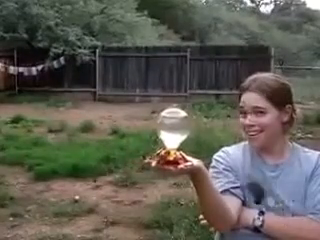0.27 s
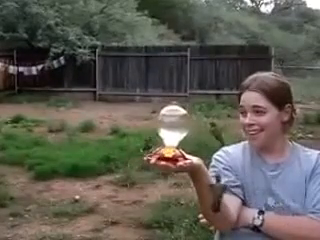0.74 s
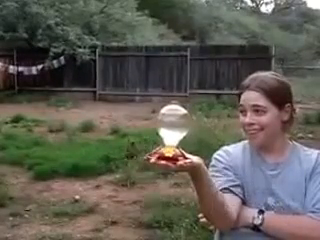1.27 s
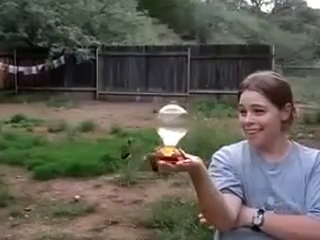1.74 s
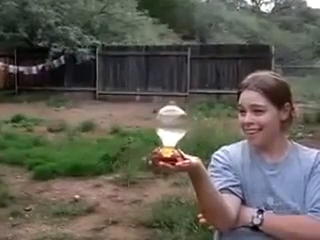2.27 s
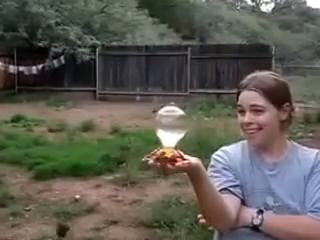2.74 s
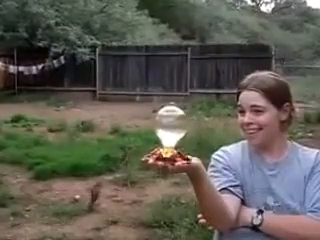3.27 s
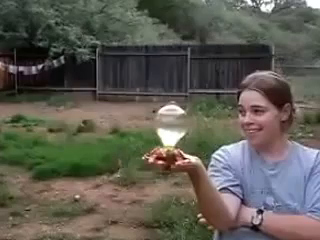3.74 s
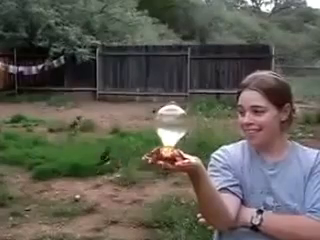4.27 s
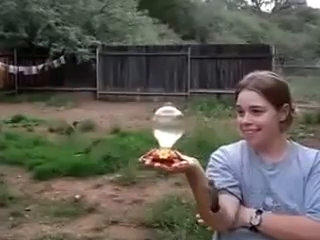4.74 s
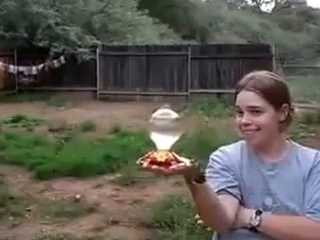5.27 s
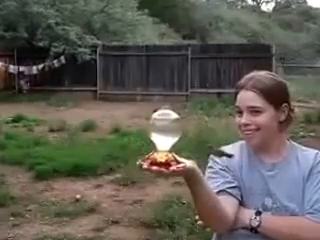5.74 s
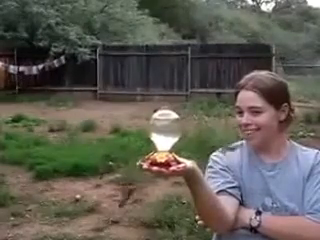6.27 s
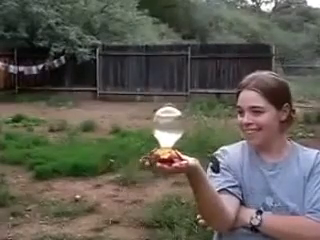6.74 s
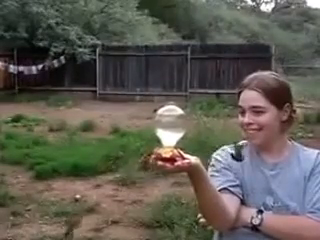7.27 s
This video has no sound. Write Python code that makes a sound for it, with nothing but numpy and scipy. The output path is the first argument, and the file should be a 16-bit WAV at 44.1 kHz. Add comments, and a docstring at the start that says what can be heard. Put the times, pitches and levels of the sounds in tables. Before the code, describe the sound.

Rapid high hummingbird chirps, brief squeals and buzzy chatter, with wings thrumming close past a small, lo-fi camera microphone outdoors.

```python
"""Hummingbirds round a feeder

Hummingbirds crowd round a hand-held feeder in a back yard. Sharp falling chips, lighter ticks and warbled
squeals are swept whistles with an octave; buzzy trills and chatter are a rough whistle gated in quick bursts.
Wings hum and purr as trains of air pulses with swishing noise; gusts are decaying low sines.
Behind lie faint far ticks, coloured air noise, a yard tail and a fence echo. A small camera with
a low sample rate folds the overtones down and adds a faint whine."""
import sys
import numpy as np
from scipy import signal
from scipy.fft import rfft, irfft
from scipy.io import wavfile
from scipy.ndimage import uniform_filter1d, map_coordinates

SR = 44100
rng = np.random.default_rng(int(sys.argv[2]) if len(sys.argv) > 2 else 0)


def int16_out(signal):
    """Quantize to a 16-bit WAV file."""
    q = np.round(np.clip(np.atleast_2d(signal).T, -1, 1) * 32767)
    wavfile.write(sys.argv[1], SR, q.astype(np.int16))


N = 331632
TIME = np.arange(N) / SR
UPSTROKE_S = .0062   # from call onset to top of sweep


def from_db(db):
    """Amplitude ratio of a level in dB."""
    return 10 ** (np.asarray(db) / 20)


def rms_one(x):
    """Scale to rms 1."""
    return x / np.sqrt(np.mean(x ** 2) + 1e-20)


def read(rows, t):
    """Interpolate each column of a curve at the times t."""
    s, *columns = np.transpose(rows)
    return [np.interp(t, s, c) for c in columns]


def add(out, s, sound):
    """Mix a sound in from time s on."""
    at = round(s * SR) + np.arange(len(sound))
    inside = (at >= 0) & (at < N)
    out[at[inside]] += sound[inside]


def wander(per_s, t):
    """Smooth random curve, spread about 1, over the times t."""
    steps = (t - t[0]) * per_s
    knots = rng.standard_normal(int(steps[-1]) + 4)
    return map_coordinates(knots, [steps + 1], order=2, mode="nearest")


def low_pass(x, hz):
    """Second-order low-pass."""
    return signal.sosfilt(signal.butter(2, min(hz, .45 * SR), fs=SR, output="sos"), x)


def noise(spectrum):
    """Gaussian noise of a given spectrum, log-interpolated in frequency; rms 1."""
    hz, db = np.transpose(spectrum)
    bins_hz = np.maximum(np.arange(N // 2 + 1) * SR / N, 1)
    gain = from_db(np.interp(np.log(bins_hz), np.log(hz), db))
    return rms_one(irfft(rfft(rng.standard_normal(N)) * gain, N))


def turns(per_s):
    """Cycles done so far at a changing rate."""
    return np.cumsum(per_s) / SR


def syrinx(hz, overtone_db):
    """Voice: a whistle with a weaker octave."""
    phase = 2 * np.pi * turns(hz)
    return np.sin(phase) + from_db(overtone_db) * np.sin(2 * phase)


def sweep(t, top_hz, knee_hz, fall_s, sag_hz_per_s, overtone_db, rough):
    """One call: pitch shoots up, rounds the top, drops to a knee, sags, then droops at the end."""
    rising = top_hz * np.exp(np.minimum(t, 0) / .0062)
    drop = np.exp(-(np.maximum(t, 0) / fall_s) ** 1.136)
    falling = knee_hz + (top_hz - knee_hz) * drop - sag_hz_per_s * t
    droop = 1 - .12 * np.exp((t - t[-1]) / .0036)
    hz = np.where(t < 0, rising, falling) * droop * (1 + rough * wander(656, t))
    return from_db(1.6 * wander(300, t)) * syrinx(hz, overtone_db)


def envelope(t, attack_s, hold_s, fade_db, fade_s, release_s):
    """A call opens, holds past the top of its sweep, fades to a softer tail and closes."""
    opening = np.clip((t - t[0]) / attack_s, 0, 1) ** 2
    closing = np.clip((t[-1] - t) / release_s, 0, 1) ** 2
    fade = from_db(fade_db * (np.exp(-np.maximum(t - hold_s, 0) / fade_s) - 1))
    return opening * closing * fade


def scattered(call, share, spread_s):
    """Feeder, arm and ground throw back 24 faint early copies, at new delays for every call."""
    paths = np.zeros(int(.03 * SR))
    delays = (.0012 + rng.exponential(spread_s, size=24)) * SR
    signs = rng.choice([-1, 1], len(delays))
    paths[delays.astype(int) % len(paths)] = share * signs / np.sqrt(len(delays))
    paths[0] = 1   # direct path
    return signal.fftconvolve(call, paths)


# chips: sweep top t/s, dry level/dB, knee f/Hz, fall time/s, upstroke level/dB
CHIP_CALLS = [(.019, -23.5, 3300, 0.0079, -20), (0.2954, -23.5, 3380, .0081, -13),
              (.423, -20, 3430, 0.0068, -12), (.945, -17, 3530, .0067, -12.5),
              (1.0463, -16, 3450, 0.0068, -12), (1.4977, -15.5, 3490, 0.0066, -10.5),
              (1.8692, -15.5, 3680, 0.0056, -3.5), (2.1415, -17, 3480, 0.0064, -4),
              (2.5238, -16, 3680, .0066, -2.5), (2.6472, -17.5, 3600, 0.0061, -14),
              (2.798, -22, 3430, .0082, -5), (3.213, -21.5, 3580, 0.0085, -24),
              (3.333, -21.5, 3450, 0.008, -15), (3.708, -25, 3720, .0066, -12),
              (4.042, -23, 3780, 0.0076, -12), (4.4282, -24.5, 3570, 0.0085, -12.5),
              (4.8155, -22, 3500, 0.007, -10.5), (5.198, -22, 3420, 0.0093, -13),
              (5.396, -21, 3610, .0074, -15), (5.5092, -21, 3630, .0077, -10),
              (5.609, -22, 3500, 0.0085, -20), (5.985, -23.5, 3440, .0086, -10.5),
              (6.079, -22, 3540, 0.0073, -12), (6.4879, -23, 3620, 0.0062, -14),
              (6.593, -22, 3400, 0.0074, -5.5), (6.731, -19, 3490, 0.0064, -10),
              (7.2187, -21, 3730, .0059, -6.5), (7.335, -19.5, 3510, 0.0081, -14),
              (7.4804, -23, 3490, 0.0074, -11)]


def chips(length_s, swell_s):
    """Loud chips: force sets the upstroke, turnover dip and tail; nearer calls are drier and richer."""
    out, t = np.zeros(N), np.arange(-UPSTROKE_S, length_s, 1 / SR)
    upstroke = np.clip(.5 - t / swell_s, 0, 1)
    turn_db = 11.5 * np.exp(-(t / .0021) ** 2)   # voice dips as the pitch turns over
    for s, db, knee_hz, fall_s, upstroke_db in CHIP_CALLS:
        nearness_db, force = db + 18.5, np.clip(1 + upstroke_db / 13, 0, 1)
        top_hz, overtone_db = 5559.5 - 25 * nearness_db, -14.5 + .35 * nearness_db
        call = sweep(t, top_hz, knee_hz, fall_s, 20000, overtone_db, rough=.0078)
        call *= envelope(t, attack_s=.0014, hold_s=.0094, fade_db=13 - 4 * force,
                         fade_s=.0064, release_s=.004)
        call *= from_db(db + upstroke_db * upstroke - force * turn_db)
        add(out, s + t[0], scattered(call, share=.36 * from_db(-.7 * nearness_db), spread_s=.0073))
    return out


def tick(knee_hz, fall_s, overtone_db, rough):
    """A lighter call that plunges faster and lower, loudest near its top."""
    t = np.arange(-UPSTROKE_S, .02, 1 / SR)
    shape = envelope(t, attack_s=.0068, hold_s=.0023, fade_db=7.5, fade_s=.0044, release_s=.0078)
    soft_upstroke = from_db(-5 * np.clip(-t / .0024, 0, 1))
    return shape * soft_upstroke * sweep(t, 5700, knee_hz, fall_s, 45000, overtone_db, rough)


# ticks: sweep top t/s, dry level/dB, knee f/Hz, fall time/s
TICK_CALLS = [(1.14, -30, 2570, .0012), (1.22, -30.5, 2710, .0024), (1.387, -37, 2610, 0.0031),
              (1.676, -28.5, 2562, 0.0021), (1.902, -30.5, 2950, 0.0017), (2.071, -36, 2560, 0.0034),
              (2.2329, -30, 2400, 0.0037), (2.412, -33.5, 2580, 0.0037), (2.5085, -30, 3020, .0017),
              (2.697, -37, 2720, .0017), (3.0852, -28.5, 2550, .0036), (3.3922, -29, 2525, .0034),
              (3.5155, -33, 2820, 0.0017), (3.955, -37, 2550, .0017), (3.988, -37.5, 2620, 0.002),
              (4.1062, -29, 2890, .0018), (4.448, -28.5, 2660, 0.0034), (4.549, -28.5, 2560, 0.003),
              (4.7046, -27, 2800, 0.0026), (5.019, -30.5, 2930, 0.0033), (5.036, -29.5, 2710, 0.0017),
              (5.177, -25.5, 2950, 0.0019), (5.219, -30, 2700, .003), (5.416, -31, 2600, 0.0022),
              (5.4529, -26, 2770, 0.0028), (5.5035, -35, 2400, 0.0039), (5.7359, -25.5, 2815, 0.0019),
              (5.857, -26, 2760, 0.0024), (5.883, -29.5, 2410, 0.0066), (6.136, -27, 2893, .0017),
              (6.194, -29.5, 2850, 0.0041), (6.31, -24, 2740, 0.0023), (6.6997, -34, 2400, 0.0033),
              (6.8403, -35.5, 2510, .0017), (6.8876, -26, 2920, .0018), (7.0632, -27, 2810, 0.0037),
              (7.17, -33.5, 2870, 0.0029), (7.1884, -28.5, 2610, 0.0023), (7.454, -31.5, 2570, 0.0021)]


def ticks():
    """Short light calls of the birds round the feeder."""
    out = np.zeros(N)
    for s, db, knee_hz, fall_s in TICK_CALLS:
        call = tick(knee_hz, fall_s, overtone_db=-9.0, rough=.018)
        add(out, s - UPSTROKE_S, from_db(db) * scattered(call, share=.6, spread_s=.007))
    return out


# squeals of chasing birds: t/s, length/s, dry level/dB, start f/Hz, end f/Hz, warble rate/Hz, depth/Hz
SQUEAL_CALLS = [(0.0, 0.016, -36, 1920, 1870, 120, 60), (0.056, .065, -38.5, 4500, 4760, 97, 262),
                (0.231, .012, -35, 3040, 2170, 70, 70), (.237, 0.058, -39.5, 2200, 1850, 120, 50),
                (.349, 0.014, -38, 4300, 2200, 140, 70), (0.354, 0.052, -42, 2005, 1880, 120, 50),
                (0.594, 0.13, -39, 3410, 3470, 132, 420), (0.607, .09, -36, 2586, 2400, 146, 700),
                (1.522, 0.023, -41.5, 1850, 1550, 250, 50), (2.094, 0.039, -40, 2260, 1740, 120, 160),
                (3.467, .026, -42.5, 4850, 4340, 105, 350), (3.473, .105, -30.5, 3600, 3416, 108, 1276),
                (3.523, 0.065, -31, 3570, 3920, 130, 750), (3.566, 0.028, -39, 4370, 5320, 155, 400)]


def squeals():
    """Held notes whose pitch shakes quickly and unevenly; low notes are reedy, faint ones wetter."""
    out = np.zeros(N)
    for s, length_s, db, start_hz, end_hz, warble_hz, depth_hz in SQUEAL_CALLS:
        t = np.arange(0, length_s, 1 / SR)
        warble = np.sin(2 * np.pi * turns(warble_hz * (1 + .08 * wander(80, t))))
        shake = warble + .13 * wander(900, t)
        hz = np.linspace(start_hz, end_hz, len(t)) + depth_hz * shake
        swell = signal.windows.tukey(len(t), .45) * from_db(db + 2.5 * wander(236, t))
        call = swell * syrinx(hz, np.interp(hz, [1900, 3000], [-5, -15]))
        add(out, s, scattered(call, share=np.interp(db, [-40, -30], [.85, .3]), spread_s=.0045))
    return out


# buzzy trills and chatter: t/s, length/s, dry level before x2 gain/dB, start f/Hz, end f/Hz, burst rate/Hz
TRILL_CALLS = [(0.051, 0.057, -37, 2450, 2500, 29.6), (0.677, 0.047, -34, 1880, 2285, 33.6),
               (0.761, .044, -35.5, 1492, 1616, 59), (.811, 0.041, -31.5, 1867, 2065, 64),
               (.844, 0.12, -39, 2190, 2400, 60), (0.929, .16, -39.5, 2370, 2745, 95),
               (1.242, .12, -44.5, 2130, 2104, 66), (1.41, .043, -35.5, 4140, 4300, 84),
               (1.556, .016, -40, 4400, 4640, 160), (2.27, 0.19, -46.5, 4200, 4250, 83),
               (2.849, .18, -47.5, 3400, 2690, 70)]


def trills():
    """A rough-pitched whistle gated in quick bursts, each row at its own rate; faint trills are wetter."""
    out = np.zeros(N)
    for s, length_s, db, start_hz, end_hz, burst_hz in TRILL_CALLS:
        t = np.arange(0, length_s, 1 / SR)
        hz = np.linspace(start_hz, end_hz, len(t)) + 360 * wander(1500, t)
        bursts = turns(burst_hz * (1 + .042 * wander(60, t)))
        from_burst_s = (bursts % 1 - .5) / burst_hz
        gate = np.exp(-(from_burst_s / .0017) ** 2) * signal.windows.tukey(len(t), .2)
        call = from_db(db + 2 * wander(90, t)) * gate * syrinx(hz, overtone_db=-13.0)
        add(out, s, 2 * scattered(call, share=np.interp(db, [-41, -33], [.8, .4]), spread_s=.0077))
    return out


def wingbeats(per_s, push_s, backstroke):
    """Each stroke sucks and pushes air; the backstroke, half a beat away, is scaled; rms 1."""
    beat = turns(per_s)
    down, back = (((beat + shift) % 1 - .5) / per_s / push_s for shift in (0, .5))
    return rms_one(down * np.exp(-down ** 2) + backstroke * back * np.exp(-back ** 2))


# feather swish spectrum: f/Hz, relative level/dB
SWISH_SPECTRUM = [(120, -23), (260, -3.5), (400, -3.5), (540, -6.5), (750, -19), (1200, -24.5), (2500, -32)]


def swish(strokes):
    """Air swishes off the feathers at every stroke; rms 1."""
    return rms_one(noise(SWISH_SPECTRUM) * np.sqrt(.37 + rms_one(low_pass(strokes, 200)).clip(0)))


# birds darting past: closest t/s, purr level/dB, passing time/s, beat rate/Hz, stroke push/s, swish level/dB
# levels apply at the closest point
WING_PASSES = [(.01, -28, 0.039, 57, .0022, -39), (.37, -35.5, 0.082, 53, 0.0013, -41.5),
               (0.579, -35, 0.021, 63, .0022, -48), (.78, -38, 0.064, 71, 0.0035, -39.5),
               (1.06, -32.5, 0.082, 80, 0.0028, -46), (1.29, -34.5, .04, 68, .002, -48),
               (1.45, -35, 0.056, 64, 0.0031, -42), (1.78, -31.5, 0.051, 67, 0.0027, -44.5),
               (2.1, -30.5, 0.035, 80, .0028, -42), (2.5, -33.5, 0.066, 72, 0.0029, -40.5),
               (2.88, -35.5, 0.067, 51, 0.0014, -40), (3.38, -38, .07, 54.4, 0.0011, -45.5),
               (4.01, -31.5, 0.048, 57.6, 0.0016, -36.5), (4.42, -39, 0.051, 46, 0.0026, -45.5),
               (4.58, -30.5, 0.025, 54, 0.0022, -49), (4.72, -36, 0.048, 58, .0014, -40),
               (4.86, -34.5, .03, 56, 0.0027, -42), (5.02, -36, 0.077, 50, 0.0013, -39),
               (5.42, -36.5, 0.065, 47, .0024, -50.5), (5.679, -38.5, 0.048, 44, 0.0019, -42.5),
               (5.9, -35, 0.081, 49.4, 0.0025, -44), (6.16, -32.5, 0.072, 57.6, 0.0017, -42.5),
               (6.6, -27, 0.09, 56.2, 0.0015, -33), (6.89, -32.5, 0.066, 49.7, 0.0017, -42.5),
               (7.22, -38.5, 0.085, 58, 0.0015, -44), (7.46, -41, 0.072, 55, .002, -48.5)]


def passes(backstroke, snap):
    """A close bird purrs and swishes by the inverse square of distance, with a snap as the wing turns."""
    out, t = np.zeros(N), np.arange(-.5, .5, 1 / SR)
    air = noise(SWISH_SPECTRUM)
    for s, db, passing_s, beat_hz, push_s, swish_db in WING_PASSES:
        distance = np.hypot(1, t / passing_s)
        swing = .03 * t / passing_s / distance   # beat is faster on the way in, slower on the way out
        rate_hz = beat_hz * (1 - swing + .012 * wander(20, t))
        strokes = wingbeats(rate_hz, push_s, backstroke)
        purr = rms_one(strokes + snap * wingbeats(rate_hz, push_s=.00064, backstroke=.1))
        pulse = np.sqrt(.44 + low_pass(purr ** 2, 180).clip(0))
        rush = rms_one(np.roll(air, rng.integers(N))[:len(t)] * pulse)
        sound = from_db(db + 2.3 * wander(55, t)) * purr + from_db(swish_db) * rush
        add(out, s + t[0], sound * signal.windows.tukey(len(t), .5) / distance ** 2)
    return out


# hovering flock, interpolated: t/s, swish level before trim/dB, hum level before trim/dB
FLOCK_LEVELS = [(0.0, -39, -36), (0.6, -40, -36.5), (0.9, -39, -32.5), (2.26, -47, -38.5), (2.74, -46, -44),
                (3.01, -37.5, -37.5), (3.54, -44, -38), (4.38, -43.5, -39), (4.92, -40.5, -35),
                (5.23, -44.5, -38), (5.9, -44, -36.5), (6.03, -38.5, -34.5), (6.43, -41.5, -38),
                (6.72, -42.5, -32.5), (6.97, -44.5, -35), (7.52, -40.5, -36)]
FLOCK_HUM_TRIM_DB, FLOCK_SWISH_TRIM_DB = -.5, .26


def flock(count):
    """Hovering birds hum together, each at its own beat and shifting level; the summed hum is evened."""
    swish_db, hum_db = read(FLOCK_LEVELS, TIME)
    hum, strokes = 0, 0
    for beat_hz in np.linspace(43, 60, count):
        rate_hz = beat_hz * np.exp(.07 * wander(6, TIME))
        wings = wingbeats(rate_hz, push_s=.0016, backstroke=.29) * from_db(2.9 * wander(5, TIME))
        hum, strokes = hum + wings, strokes + wings ** 2
    even_hum = hum / np.sqrt(uniform_filter1d(hum ** 2, size=8000) + 1e-9)
    hum_gain, swish_gain = from_db(hum_db + FLOCK_HUM_TRIM_DB), from_db(swish_db + FLOCK_SWISH_TRIM_DB)
    return hum_gain * even_hum + swish_gain * swish(strokes)


# wing gusts on the microphone: t/s, level before decay/dB
WING_GUSTS = [(1.745, -15.5), (1.760, -21), (1.772, -32), (1.813, -22)]


def gusts(thump_hz, decay_s):
    """Downwash knocks on the microphone in short dull thumps."""
    out, t = np.zeros(N), np.arange(0, .05, 1 / SR)
    thump = np.sin(2 * np.pi * thump_hz * t) * np.exp(-t / decay_s)
    for s, db in WING_GUSTS:
        add(out, s, from_db(db) * thump)
    return out


def far_birds(dry_db, count):
    """Faint, heavily scattered ticks at random times from birds waiting in the trees."""
    out = np.zeros(N)
    for when, size, pitch in rng.random((count, 3)):
        call = tick(2500 + 900 * pitch, .003, overtone_db=-11, rough=.04)
        far_call = scattered(call, share=1.8, spread_s=.022)
        add(out, when * N / SR, from_db(dry_db - 4 * size) * far_call)
    return out


def yard(x, wet_db, t60_s, fence_s, fence_db):
    """A thin tail from grass and trees, and one echo off the fence."""
    t = np.arange(0, .5, 1 / SR)
    tail = rng.standard_normal(len(t)) * from_db(-60 * t / t60_s) * (1 - np.exp(-t / .0072))
    tail *= from_db(wet_db) / np.sqrt(np.sum(tail ** 2))
    echo = from_db(fence_db) * (np.arange(len(t)) == round(fence_s * SR))
    return x + signal.fftconvolve(x, tail + echo)[:N]


# background air spectrum: f/Hz, relative level/dB
AIR_SPECTRUM = [(25, -1), (50, -1), (110, -1.5), (250, -2.5), (500, -18.5), (800, -14), (1400, -21.5),
                (2500, -19), (4000, -23), (5000, -24), (5500, -28.5), (5900, -73.5)]


def background_air(level_db):
    """Coloured noise with a slightly wandering level."""
    return from_db(level_db + .5 * wander(7.5, TIME)) * noise(AIR_SPECTRUM)


def camera_whine(rms_db, centre_hz):
    """Faint sine whose pitch wanders by a few Hz."""
    hz = centre_hz + 1.9 * wander(15, TIME)
    return from_db(rms_db) * np.sqrt(2) * np.sin(2 * np.pi * turns(hz))


def scene():
    """Calls ring in the yard; wings, air and whine stay dry."""
    calls = chips(length_s=.03, swell_s=.0082) + ticks() + squeals() + trills()
    calls += far_birds(dry_db=-45.5, count=26)
    wings = passes(backstroke=.28, snap=.2) + flock(count=5) + gusts(thump_hz=176, decay_s=.009)
    yard_calls = yard(calls, wet_db=-19.5, t60_s=.3, fence_s=.06, fence_db=-41.0)
    return (yard_calls + wings + background_air(-40.5) + camera_whine(-59, 1823))[None]


def record(dry):
    """Every fourth sample is kept, so overtones fold down; soft smoothing lets mirror tones through above."""
    dc_offset, cutoff_hz = -.0284, 7558
    kept = 4 * dry * (np.arange(N) % 4 == 0)
    smoothing = signal.firwin(49, SR / 8, window=("kaiser", 7), fs=SR)
    smooth = signal.fftconvolve(kept, smoothing[None], mode="same")
    return dc_offset + signal.sosfilt(signal.ellip(8, .1, 70, cutoff_hz, fs=SR, output="sos"), smooth)


dry = scene()
out = record(dry)
int16_out(out)
```